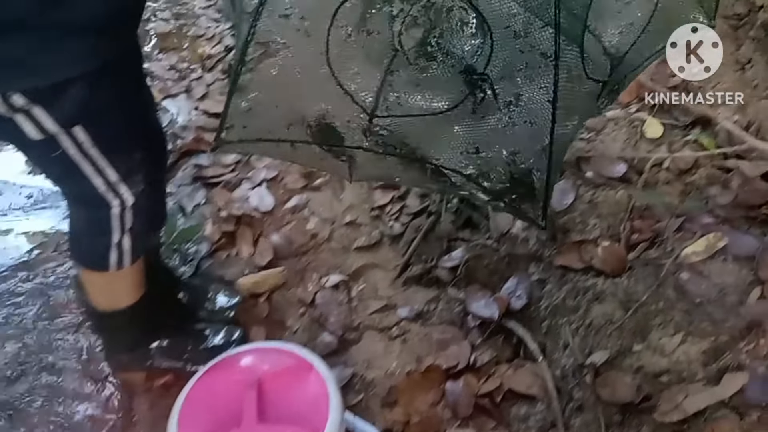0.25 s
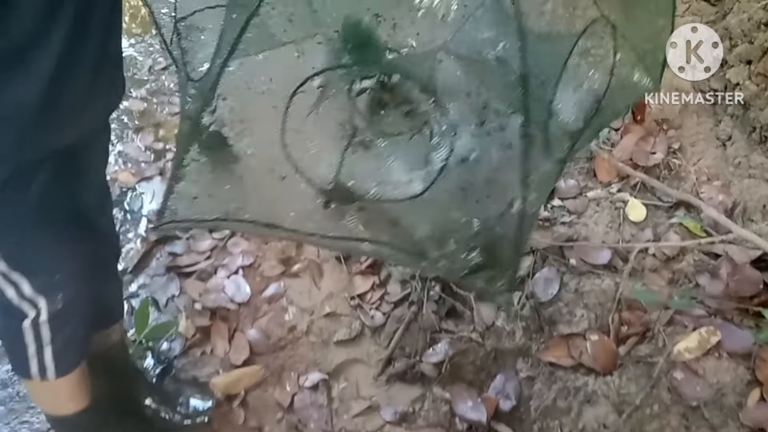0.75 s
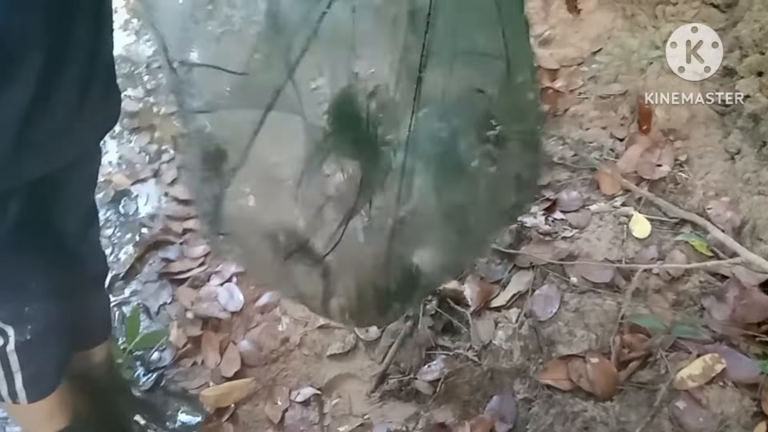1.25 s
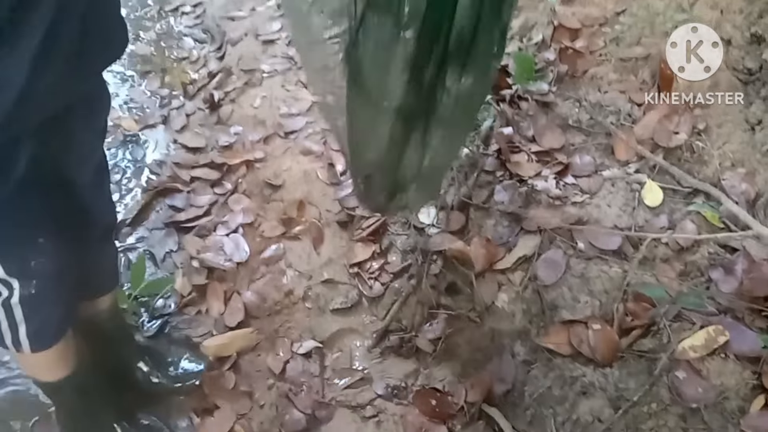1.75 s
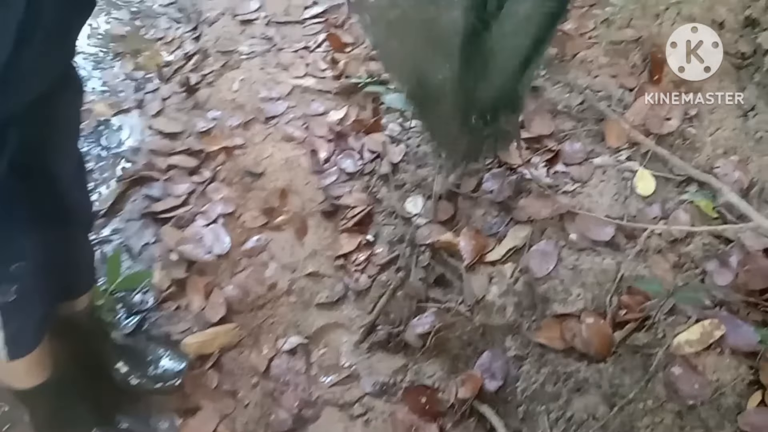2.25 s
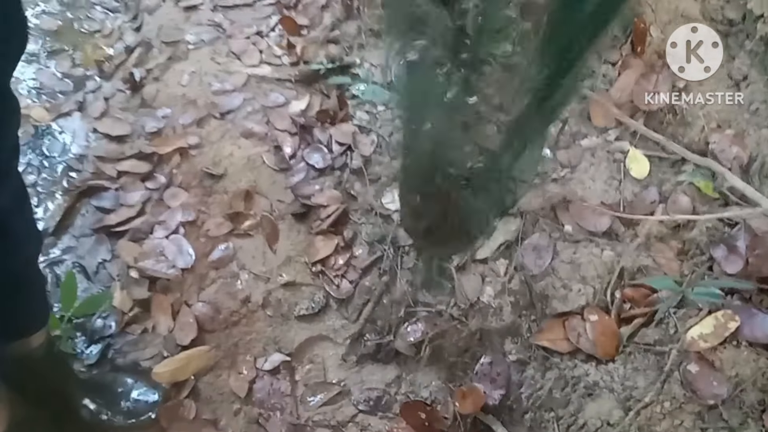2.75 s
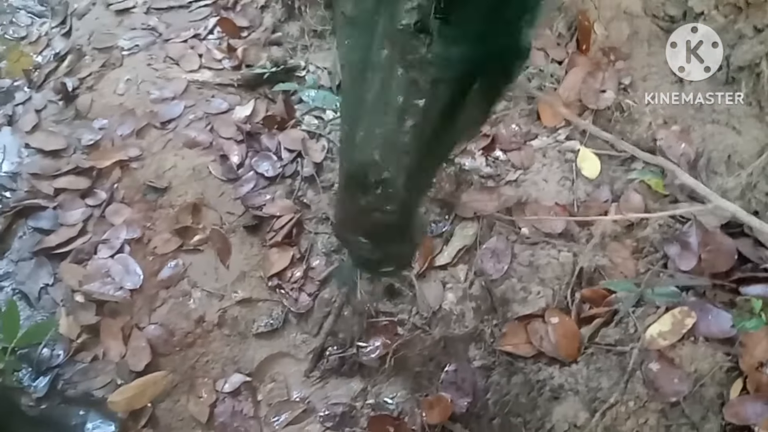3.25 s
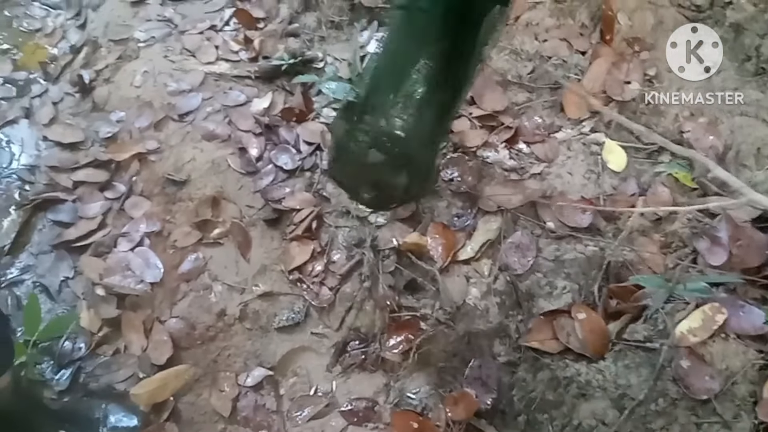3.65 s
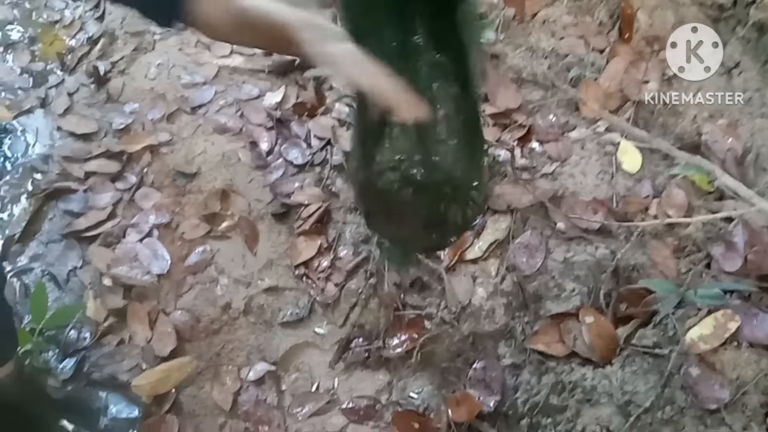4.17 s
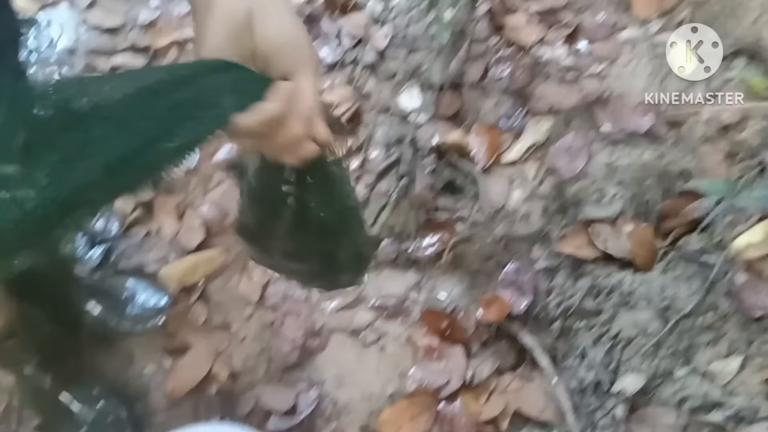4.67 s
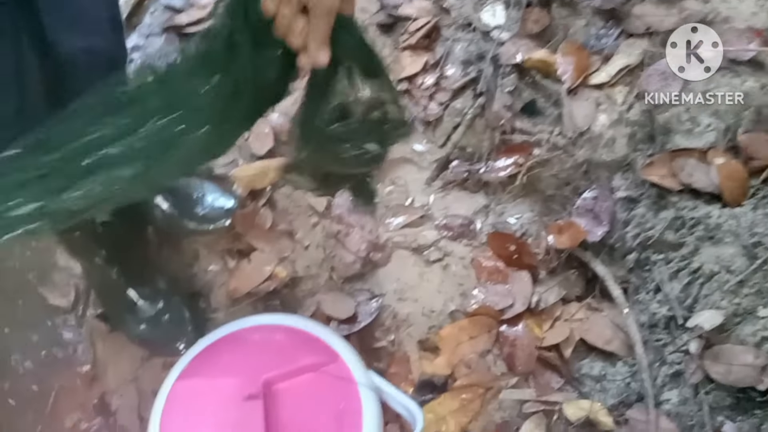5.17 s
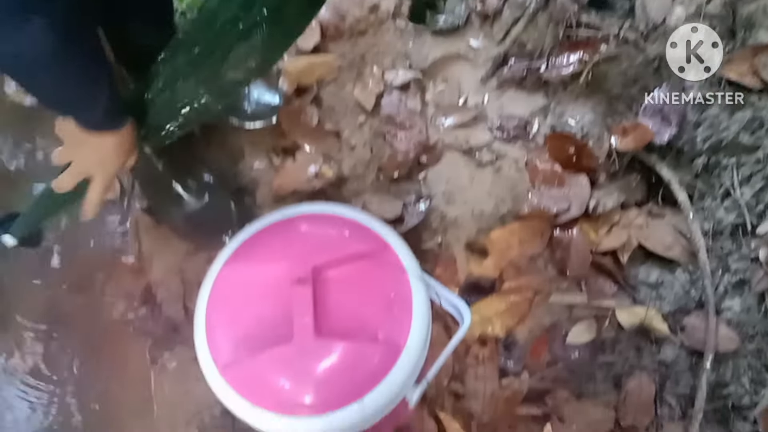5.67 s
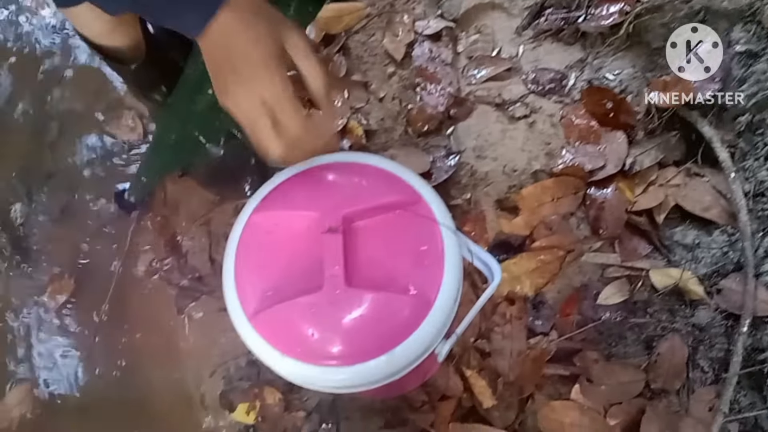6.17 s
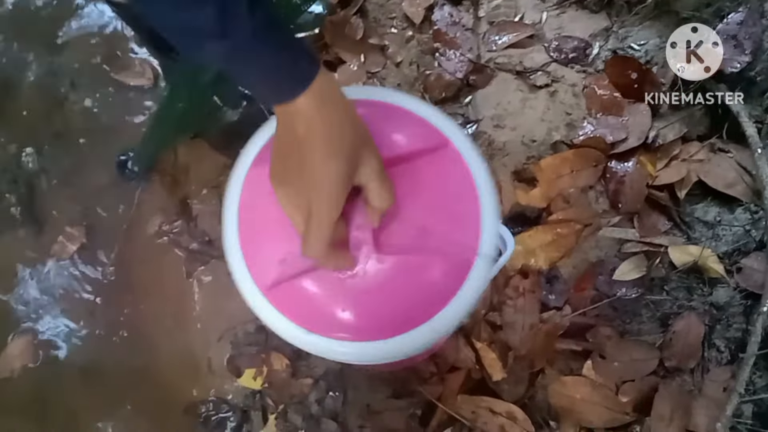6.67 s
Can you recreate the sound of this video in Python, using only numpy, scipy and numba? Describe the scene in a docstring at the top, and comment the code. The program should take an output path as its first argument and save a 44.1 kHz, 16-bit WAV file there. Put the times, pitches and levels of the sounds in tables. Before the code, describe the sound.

Dense wet rustling of netting, bright and crackly, opens abruptly, followed by a soft downward swish and a lull. Snappy rib clicks and repeated shakes follow, then a flurry of low bumps and plasticky snaps from a hand on the recording device. It ends sparse and quiet, with small taps and faint brook hiss, mono, coloured by a bright ringing upper midrange.

```python
"""Wet mesh rustles at once in dense grains and bright pings: a net trap on wire ribs, worked by hand near a camera.
Each rustle is a granular sum of short damped rings whose density of slips sets the clumping.
Ribs and knots click as noise-excited resonances, and small parts ping as dying tones; wet cloth swishes by.
The grip knocks, flexes and scrapes the camera body; a brook hisses faintly as bands of noise.
The microphone port rings near 3.5 kHz and colours everything."""
import sys
import numpy as np
from scipy import signal
from scipy.fft import rfft, irfft
from scipy.io import wavfile
from scipy.ndimage import uniform_filter1d
from numba import njit

SR = 44100
rng = np.random.default_rng(int(sys.argv[2]) if len(sys.argv) > 2 else 0)


def transcribe(signal):
    """Save signal, clipped to [-1, 1], as a 16-bit WAV file at the path in sys.argv[1]."""
    frames = np.atleast_2d(signal).T
    limited = np.clip(frames, -1, 1)
    pcm = np.round(limited * 32767).astype(np.int16)
    wavfile.write(sys.argv[1], SR, pcm)


N = 305172  # length in samples


def undb(db):
    """Level to amplitude: 20 dB is a factor of ten."""
    return 10 ** (np.asarray(db) / 20)


def unit(x):
    """Normalisation to an RMS amplitude of one."""
    return x / np.sqrt(np.mean(x ** 2))


def band(x, hz, width):
    """Two-pole resonance: gain 1 at the centre, bandwidth in Hz."""
    return signal.lfilter(*signal.iirpeak(hz, hz / width, fs=SR), x)


def walk(rate):
    """Slow random modulation: levels held 1 / rate s and smoothed twice, spread near 1."""
    hold = int(SR / rate)
    steps = np.repeat(rng.standard_normal(N // hold + 1), hold)
    return 1.1 * uniform_filter1d(uniform_filter1d(steps, hold), hold)[:N]


def curves(table):
    """Linear interpolation in time of every column after the first."""
    s, *columns = np.transpose(table)
    return [np.interp(np.arange(N) / SR, s, c) for c in columns]


def add(out, sound, start):
    """Superposition of a short sound from a given sample."""
    out[start:start + len(sound)] += sound[:len(out) - start]


def net():
    """Friction noise of the mesh: coarse rub, main rustle, fine crackle and lone ticks follow the hand's moves."""
    # grains of coarse rub, main rustle and fine crackle: lowest f/Hz, highest f/Hz, rate/(grains per s),
    # twice the longest 1/e decay/cycles, size scatter/dB, clumping/dB
    grain_kinds = [(619.5, 1798, 1500, 30, 3.5, 2), (1890, 4860, 1800, 18, 1, 2.5),
                   (4890, 11950, 3800, 23, 1.4, 2.3)]
    # lone knots and droplets, columns as for the grains
    tick_kind = (2090, 7800, 200, 3.5, 2.35, 1.1)
    # the wet mesh drips and sways throughout: t/s, level of the main rustle/dB
    sway_table = [(0, -36.5), (.45, -62.5), (1.18, -65.5), (1.4, -54.5), (2.0, -60.5), (2.11, -63),
                  (2.22, -56), (2.9, -61), (3.5, -46), (3.8, -62.5), (4.6, -81), (4.75, -67), (5.1, -57),
                  (5.3, -62.5), (5.52, -61.5), (5.7, -77), (5.8, -74), (5.89, -88), (6.08, -70),
                  (6.92, -69)]
    # tugs, folds and shakes: peak t/s, rise/s, fall/s, coarse rub level/dB, main rustle level/dB,
    # fine crackle level/dB
    tug_table = [(0.0, .05, 0.25, -28.5, -37.5, -34), (.17, 0.16, 0.13, -38.5, -37.5, -33),
                 (.31, 0.069, 0.059, -42.5, -33.5, -37), (.56, 0.056, 0.7, -84, -63, -51),
                 (.74, 0.17, 0.24, -54, -50.5, -57), (1.25, 0.014, 0.11, -48, -34, -26.5),
                 (1.64, 0.14, 0.29, -62.5, -46.5, -45), (2.16, 0.036, 0.068, -48, -42.5, -39),
                 (2.28, 0.094, 0.32, -42.5, -43, -34.5), (2.46, 0.072, 0.033, -44.5, -39, -31.5),
                 (2.7, 0.29, 0.32, -43, -40, -37.5), (2.9, 0.086, 0.23, -43, -41.5, -32.5),
                 (3.09, 0.075, 0.13, -37, -38.5, -33), (3.36, 0.61, 0.072, -44, -45, -37.5),
                 (3.58, 0.085, 0.047, -39, -56.5, -61), (3.62, 0.084, 0.17, -49, -59, -39.5),
                 (3.96, 0.09, 0.084, -42.5, -45, -39.5), (4.08, 0.2, 0.12, -50.5, -57, -47),
                 (4.67, 0.046, 0.22, -43, -44.5, -39.5), (4.86, 0.4, 0.12, -43, -44, -40),
                 (5.05, 0.12, 0.037, -44.5, -43, -45), (5.16, 0.0044, 0.17, -46, -45, -52),
                 (5.24, 0.1, 0.064, -50, -44.5, -36), (5.63, 0.045, 0.058, -54, -64, -63),
                 (5.75, 0.055, 0.037, -52.5, -55.5, -56), (5.98, 0.038, 0.055, -75, -77, -42),
                 (6.66, 0.061, 0.069, -50.5, -57, -52.5), (6.737, 0.03, 0.1, -44.5, -50, -67),
                 (6.78, 0.039, 0.031, -51, -39.5, -37)]
    coarse_db, fine_db, ticks_db = -6, 2, -5.5  # against the main rustle; the first two hold for the sway alone
    sway_db, = curves(sway_table)
    coarse, main, fine = swells(tug_table, [sway_db + coarse_db, sway_db, sway_db + fine_db])
    return rustle([coarse, main, fine, main * undb(ticks_db)], grain_kinds + [tick_kind])


def swells(moves, rest_db):
    """Addition of powers: every move grows and decays exponentially over a resting level; returns gains."""
    swell_db = 20  # rise and fall are the times for this change of level
    t = np.arange(N) / SR
    power = [undb(db) ** 2 + np.zeros(N) for db in rest_db]
    for s, rise, fall, *peak_db in moves:
        distance = np.where(t < s, (s - t) / rise, (t - s) / fall)
        shape = undb(-swell_db * distance) ** 2
        power = [p + shape * undb(db) ** 2 for p, db in zip(power, peak_db)]
    return np.sqrt(power)


def slips():
    """Stick-slip: loudness jumps when something lets go, then relaxes; log scale, spread 1."""
    slip_rate, settle_ms = 83, 14.4  # slips per s, 1/e time of each
    steady_rub = 1  # bed under the slips
    when, luck = rng.random((3000, 2))[:int(slip_rate * N / SR)].T
    kicks = np.zeros(N)
    kicks[(when * N).astype(int)] = -np.log(1 - luck)
    settling = signal.lfilter([1], [1, -np.exp(-1 / (settle_ms * SR / 1000))], kicks)
    level = np.log(steady_rub + settling)
    return (level - level.mean()) / level.std()


@njit
def sprinkle(start, pole, size, n):
    """Damped oscillation: each grain is a rotating phasor that shrinks until it is negligible."""
    out = np.zeros(n)
    for k in range(len(start)):
        z, i = size[k] + 0j, start[k]
        while i < n and abs(z) > size[k] / 300:
            out[i] += z.imag
            z, i = z * pole[k], i + 1
    return out


def rustle(gains, kinds):
    """Granular friction: slipping surfaces give tiny rings in quick clumps, many from a few taut strands."""
    strand_s, strand_share = 0.04, 0.65  # time a taut strand keeps its pitch, its part of the grains
    strand_spread = 0.04  # detuning as a part of the log pitch range
    out, jerks = 0, slips()
    for gain, (low_hz, high_hz, rate, cycles, scatter_db, clump_db) in zip(gains, kinds):
        when, pitch, luck, ring, which = rng.random((40000, 5))[:int(rate * N / SR)].T
        strands = rng.random((2000, 2))
        is_taut = which < strand_share
        second = (which > strand_share / 2).astype(int)
        turn = (when * N / SR / strand_s + second / 2).astype(int)  # two strands change by turns
        taut_pitch = strands[turn, second] + strand_spread * (pitch - .5)
        hz = low_hz * (high_hz / low_hz) ** np.where(is_taut, taut_pitch, pitch)
        ring = np.where(is_taut, np.sqrt(ring), ring)  # taut strands ring longer
        decay_cycles = (cycles / 2) ** ring  # from dull ticks to short wet rings
        damping = hz / SR / decay_cycles
        # the root of the damping gives short and long grains equal energy
        size = undb(-scatter_db * np.log(1 - .995 * luck)) * np.sqrt(damping)
        pole = np.exp(2j * np.pi * hz / SR - damping)
        grains = sprinkle((when * N).astype(np.int64), pole, size, N)
        highpass = signal.butter(6, 0.68 * low_hz, "high", fs=SR, output="sos")
        grains = signal.sosfilt(highpass, grains)
        out = out + unit(grains * undb(clump_db * jerks)) * gain
    return out


def clicks():
    """Impact resonance: tiny impacts ring at a pitch with a broad crack; nearby mesh scatters a faint tail."""
    # ribs, knots and drops: t/s, level/dB, ring f/Hz, fade t60/ms
    click_table = [(0.103, -43, 567, 59), (0.301, -18, 5420, 23), (0.321, -24, 2400, 18),
                   (0.373, -36, 5300, 11), (0.465, -34.5, 4640, 21), (0.547, -33, 5470, 13),
                   (1.212, -23, 8200, 5.1), (1.242, -18, 3630, 19), (1.312, -7, 5200, 1.7),
                   (1.318, -6.5, 6100, 5.7), (1.98, -37, 4170, 34), (2.211, -33.5, 560, 47),
                   (2.241, -38, 497, 39), (2.284, -31, 2350, 26), (2.377, -25.5, 8100, 8.1),
                   (2.881, -14.5, 6900, 4.1), (2.942, -19.5, 5250, 7.6), (3.017, -26.5, 9400, 25),
                   (3.238, -15, 6760, 12.6), (3.446, -11, 6600, 12), (3.583, -28, 1240, 39),
                   (3.61, -16.5, 6300, 11), (3.956, -24.5, 1580, 12.5), (3.956, -19, 4900, 3.5),
                   (4.723, -17.5, 8500, 6.4), (4.73, -15, 2890, 8.2), (4.745, -29, 7430, 36),
                   (4.81, -35, 1834, 27), (4.885, -32, 5360, 25), (4.898, -23, 4020, 7.8),
                   (4.949, -13, 5120, 8.7), (5.037, -22, 5430, 19), (5.183, -30, 5900, 15),
                   (5.261, -33, 6100, 32), (5.628, -42, 1390, 6.6), (5.723, -33, 3040, 21),
                   (5.729, -26.5, 5460, 5), (5.862, -44.5, 8100, 21), (5.943, -38.5, 4940, 24),
                   (5.957, -30.5, 5350, 25), (5.965, -39, 5000, 26), (5.981, -54, 5150, 12),
                   (5.994, -32.5, 6550, 14), (6.592, -41.5, 1940, 5), (6.652, -30.5, 7600, 5.5)]
    # wet knots let go: t/s, level/dB
    knot_table = [(.011, -27), (.026, -40), (.128, -39), (.181, -25), (.194, -17.5), (.206, -30),
                  (.215, -28), (.257, -36), (.298, -21), (1.972, -39), (2.166, -24), (2.174, -32),
                  (2.343, -33), (2.419, -38), (2.453, -32), (2.63, -27), (2.648, -29), (2.684, -39),
                  (2.737, -23.5), (2.849, -27.5), (3.067, -30), (3.088, -28), (3.096, -31), (3.302, -35),
                  (3.348, -42), (3.519, -38), (4.8, -36), (4.808, -27), (4.842, -24), (4.858, -22),
                  (4.868, -20), (4.91, -26), (5.164, -41), (5.201, -37), (5.601, -37), (5.618, -34),
                  (5.827, -48), (5.841, -51.5), (6.066, -47), (6.107, -46), (6.338, -48), (6.489, -46.5),
                  (6.617, -48)]
    knot_hz, knot_spread, knot_t60_ms = 3430, 0.45, 7  # each at its own pitch near this one
    rise_ms = 0.28
    first_force, first_ms = 2.3, 0.49  # extra force of the first contact, how fast it passes
    ring_spread = 4.4  # width of each resonance over that of a pure mode with the same decay
    crack_db, crack_ms = -2, 4.1  # level against the click, longest t60
    tail_db, tail_ms = -5, 50.4  # noise level fed to the tail against the click, t60
    lowest_hz = 383  # small parts give no bass
    out, ms = np.zeros(N), 1000 * np.arange(4096) / SR
    rise = 1 - np.exp(-ms / rise_ms)
    pitches = knot_hz * (1 + knot_spread * rng.uniform(-1, 1, len(knot_table)))
    knots = [(s, db, hz, knot_t60_ms) for (s, db), hz in zip(knot_table, pitches)]
    for s, db, hz, t60_ms in click_table + knots:
        burst, scatter = rng.standard_normal((2, len(ms))) * rise
        burst = burst * (1 + first_force * np.exp(-ms / first_ms))  # the first contact is the hardest
        fade = 1000. ** (-ms / t60_ms)
        quick = 1000. ** (-ms / min(t60_ms, crack_ms))
        width = min(ring_spread * 2200 / t60_ms, 2 * hz)  # the quicker it dies, the broader it rings
        ring = unit(band(band(burst * fade, hz, width), hz, width)) * np.std(rise * fade)
        crack = unit(band(burst * quick, 4630, 5900)) * np.std(rise * quick) * undb(crack_db)
        tail = band(scatter, hz, hz) * undb(tail_db) * np.exp(-ms / tail_ms * 3 * np.log(10))
        add(out, undb(db) * (ring + crack + tail), int(s * SR))
    return signal.sosfilt(signal.butter(4, lowest_hz, "high", fs=SR, output="sos"), out)


def pings():
    """Free vibration: small hard parts and hollows give clean, exponentially dying tones with a soft start."""
    # t/s, peak level/dB, f/Hz, t60/ms
    ping_table = [(0.0408, -10.5, 1033, 20), (0.043, -18.5, 1500, 19), (0.0508, -13.5, 1854, 24),
                  (0.081, -27.5, 984, 90), (2.067, -28.5, 970, 4.9), (2.0735, -21.5, 750, 11),
                  (2.073, -34, 2020, 7.5), (5.902, -49.5, 3760, 15), (5.958, -43, 2660, 60),
                  (5.994, -49, 2060, 57), (5.994, -34, 4065, 33), (6.001, -44, 3940, 41),
                  (6.068, -50, 283, 120), (6.091, -40, 266, 43), (6.504, -47, 440, 60),
                  (6.522, -44, 457, 54), (6.779, -32, 867, 50), (6.792, -30.5, 640, 28)]
    rise_cycles = 1.2
    out, t = np.zeros(N), np.arange(4096) / SR
    for s, db, hz, t60_ms in ping_table:
        shape = (1 - np.exp(-t * hz / rise_cycles)) * 1000. ** (-1000 * t / t60_ms)
        tone = np.sin(2 * np.pi * hz * t)
        add(out, undb(db) * shape / shape.max() * tone, int(s * SR))
    return out


def swish():
    """Modulated noise: wet cloth sweeps past as slow noise on a carrier that glides down."""
    # t/s, centre f/Hz, level/dB
    swish_table = [(.66, 1900, -63), (.73, 1650, -47.5), (.88, 1233, -55.5), (.97, 850, -52.5),
                   (1.0, 800, -89)]
    hz, db = curves(swish_table)
    t = np.arange(N) / SR
    slow = signal.lfilter(*signal.butter(2, 350, fs=SR), rng.standard_normal((2, N)))
    carrier = np.exp(2j * np.pi * np.cumsum(hz) / SR)
    hiss = ((slow[0] + 1j * slow[1]) * carrier).real
    return unit(hiss) * undb(db) * (t > swish_table[0][0]) * (t < swish_table[-1][0])


def knocks():
    """Pressure relief: a push on the body, with a weaker bounce, rebounds through the vent as a wobble."""
    # the grip shifts on the camera body: t/s at the end of the push, peak level/dB, f/Hz
    knock_table = [(2.729, -12, 488), (2.923, -26.5, 287), (3.018, -22, 257), (3.073, -19.5, 356),
                   (3.108, -21.5, 315), (3.267, -15, 400), (3.574, -25.5, 403), (3.681, -29.5, 243),
                   (3.698, -33, 205), (3.73, -18.5, 403), (3.895, -18, 347), (3.959, -32, 265),
                   (3.979, -28, 280), (4.086, -33, 250), (4.119, -31.5, 182), (4.256, -30.5, 187),
                   (4.317, -20, 203), (4.343, -22.5, 210), (4.385, -13.5, 453), (4.395, -18, 304),
                   (4.437, -19, 260), (4.443, -13, 299), (4.454, -25, 308), (4.472, -24, 242),
                   (4.497, -12, 353), (4.517, -17.5, 390), (4.532, -33, 190), (4.586, -12, 416),
                   (4.593, -20.5, 248), (4.611, -23, 266), (4.632, -26, 249), (4.64, -33, 206),
                   (4.711, -13, 317), (6.241, -46.5, 137), (6.514, -39.5, 150), (6.528, -38.5, 168),
                   (6.61, -32.5, 173), (6.723, -31.5, 181), (6.756, -29.5, 448)]
    vent_hz, push_cycles = 104.5, 0.605  # vent that lets slow pressure out; push length in cycles of f
    rasp_db, rasp_hz = -22.5, 1060  # skin drags on the casing during the push; level against it
    out, t = np.zeros(N), np.arange(3000) / SR
    vent = signal.butter(5, vent_hz, "high", fs=SR, output="sos")
    for s, db, hz in knock_table:
        late, share = rng.random(2)
        push = np.sin(np.pi * np.minimum(t * hz / push_cycles, 1)) ** 2
        bounce = np.roll(push, int((1 + 2 * late) * SR / hz))
        push = push + 0.33 * share * bounce
        rasp = unit(band(rng.standard_normal(len(t)), rasp_hz, rasp_hz)) * undb(rasp_db)
        knock = signal.sosfilt(vent, push * (1 + rasp))
        add(out, undb(db) * knock / np.abs(knock).max(), int((s - push_cycles / hz) * SR))
    return out


def snaps():
    """Flexure: the casing makes one sharp cycle out and back and rattles as fading narrow noise."""
    # t/s, level of the cycle/dB, f/Hz
    snap_table = [(4.3830, -19, 1330), (4.4401, -21.5, 1700), (4.4464, -28, 2090), (4.4974, -23.5, 1200),
                  (4.559, -18, 1370), (4.585, -28.5, 1350), (4.7092, -17.5, 1380)]
    rattle_db, rattle_s = -22.5, 0.0054  # level against the cycle at the start, 1/e time
    out, t = np.zeros(N), np.arange(1000) / SR
    for s, db, hz in snap_table:
        cycle = np.sin(2 * np.pi * np.minimum(t * hz, 1) ** 0.95)
        rattle = unit(band(rng.standard_normal(len(t)), hz, hz)) * undb(rattle_db) * np.exp(-t / rattle_s)
        add(out, undb(db) * (cycle + rattle), int(s * SR))
    return out


def slides():
    """Sliding friction: a hand moving on the camera body gives grains of low rumble and of scrape."""
    # rumble and scrape grains: lowest f/Hz, highest f/Hz, rate/(grains per s),
    # twice the longest 1/e decay/cycles, size scatter/dB, clumping/dB
    rub_kinds = [(65, 200, 170, 3.2, 3.6, 1.5), (211, 740, 500, 7.1, 3.7, 2.5)]
    # peak t/s, rise/s, fall/s, rumble level/dB, scrape level/dB
    slide_table = [(1.24, 0.039, 0.025, -71, -39), (1.64, 0.34, 0.33, -62, -87),
                   (2.09, .1, 0.031, -49, -52.5), (2.26, 0.062, 0.43, -96, -59.5),
                   (2.72, 0.015, 0.061, -65, -42), (3.06, 0.31, 0.16, -56, -54),
                   (3.26, .07, 0.36, -58.5, -50.5), (3.59, 0.093, 0.44, -59, -65),
                   (3.95, 0.082, 0.079, -58, -44), (4.55, 0.58, 0.26, -47, -51),
                   (5.94, 0.074, 0.15, -54.5, -81), (6.52, 0.033, 0.034, -49, -56),
                   (6.77, 0.17, 0.067, -61, -39.5)]
    rest_db = [-81.5, -73]  # rumble and scrape of the hand at rest
    return rustle(swells(slide_table, rest_db), rub_kinds)


def brook():
    """Turbulence noise: half-octave bands of distant water swell together and flicker alone."""
    # f/Hz, mean level per half octave/dB
    brook_table = [(60, -86), (200, -86), (600, -77), (1500, -91.5), (3400, -73), (6000, -75), (10000, -82)]
    out, swell = 0, walk(0.33)
    f, db = np.transpose(brook_table)
    for hz in 50 * 2 ** np.arange(0, 8.1, .5):
        hiss = unit(band(rng.standard_normal(N), hz, hz / 3))
        level_db = np.interp(np.log(hz), np.log(f), db)
        out = out + hiss * undb(level_db + 0.5 * swell + 0.54 * walk(10))
    return out


def scene():
    """Superposition of the net, the hand on the camera body and the brook, as one channel."""
    trap = net() + clicks() + pings() + swish()
    hand = knocks() + snaps() + slides()
    return (trap + hand + brook())[None]


def record(dry):
    """Minimum phase: the port's log gain fixes its causal response; the top steps down and is cut."""
    # colour of the microphone port: f/Hz, gain/dB
    port_table = [(25, -11.5), (70, -2.5), (800, -4.5), (1400, 3.5), (2300, 4.5), (3500, 17.5), (4050, 12),
                  (4670, 4), (5900, 4), (7900, -5.5), (9550, -17.5), (11800, -33), (15000, -23)]
    shelf_hz, shelf_db, top_hz = 11900, 24, 15500  # where the top steps down, by how much, where it ends
    f, db = np.transpose(port_table)
    log_gain = np.interp(np.log(np.linspace(1, SR / 2, 1025)), np.log(f), db) * np.log(10) / 20
    cepstrum = irfft(log_gain)
    # folding the later half onto the earlier makes the response causal
    cepstrum[1:1024] *= 2
    cepstrum[1025:] = 0
    response = irfft(np.exp(rfft(cepstrum)))[None, :1024]
    heard = signal.fftconvolve(dry, response)[:, :N]
    shelf = signal.ellip(5, .5, shelf_db, shelf_hz, fs=SR, output="sos")
    heard = signal.sosfilt(shelf, heard)
    return signal.sosfilt(signal.ellip(8, .2, 70, top_hz, fs=SR, output="sos"), heard)


dry = scene()
out = record(dry)
transcribe(out)
```